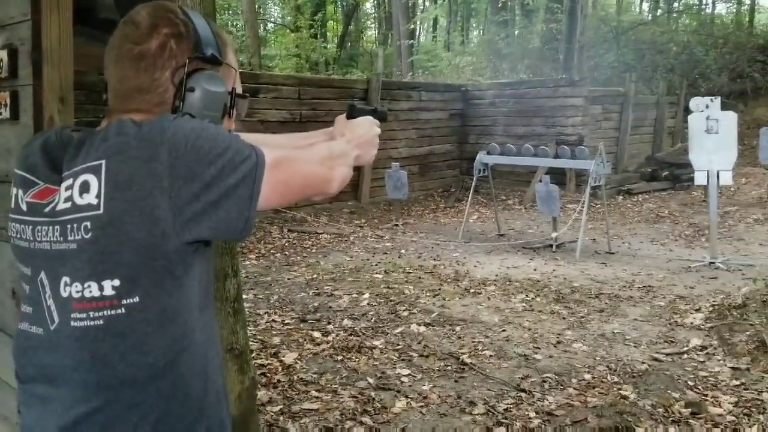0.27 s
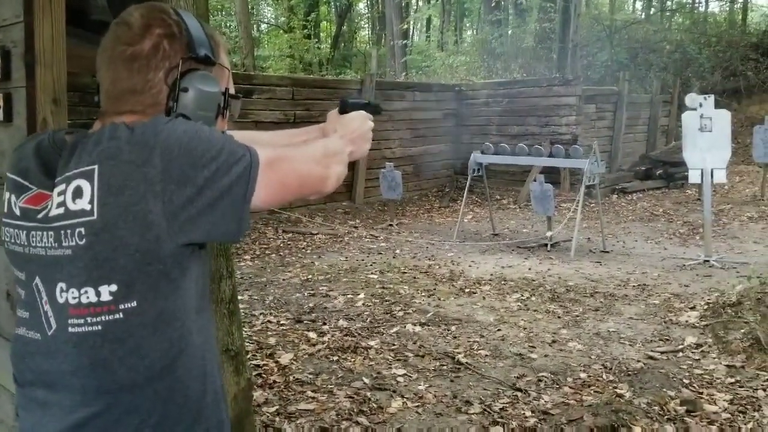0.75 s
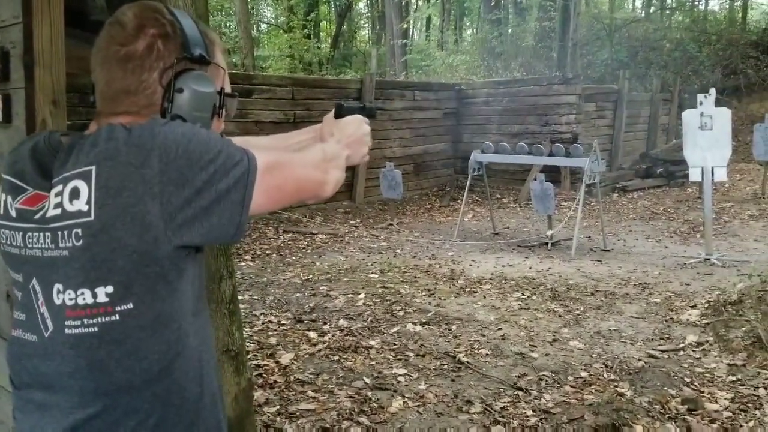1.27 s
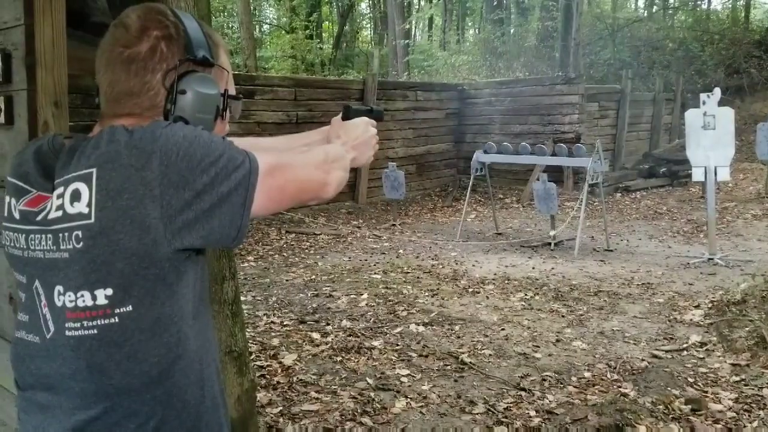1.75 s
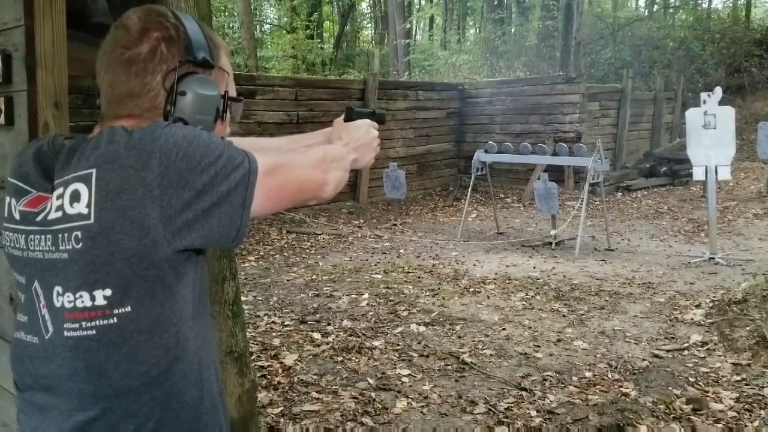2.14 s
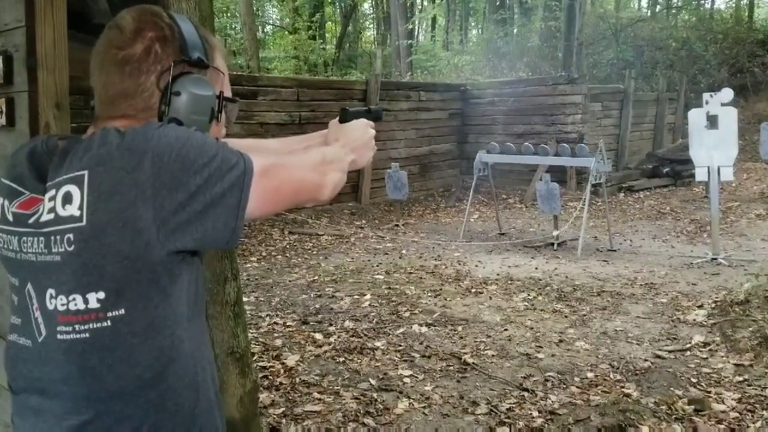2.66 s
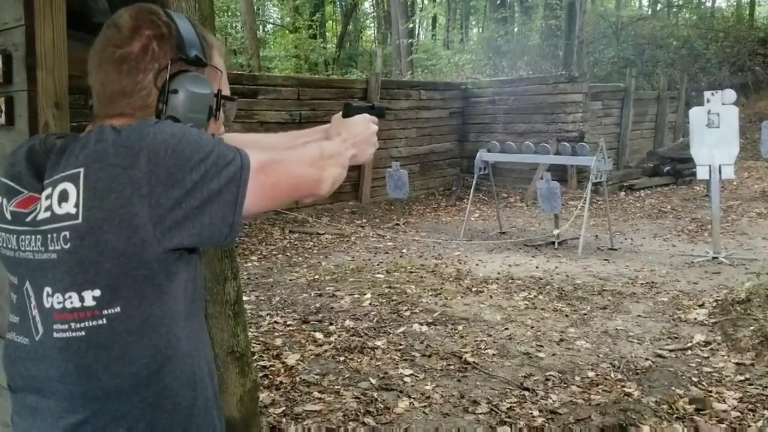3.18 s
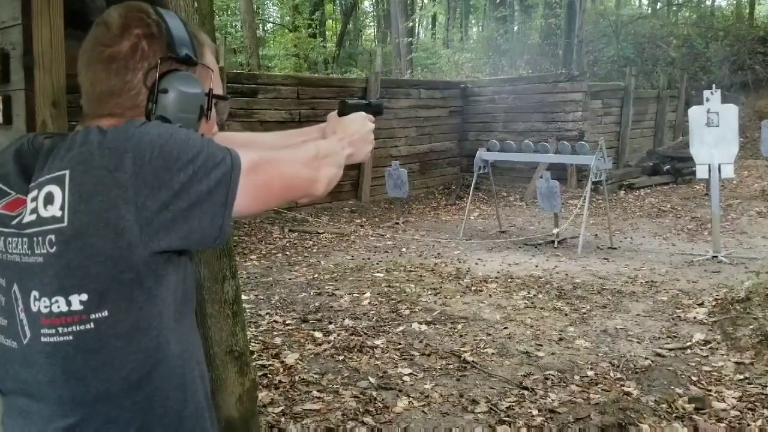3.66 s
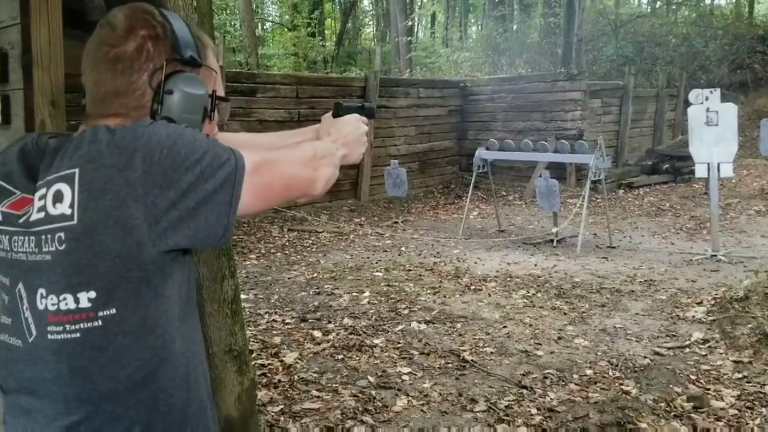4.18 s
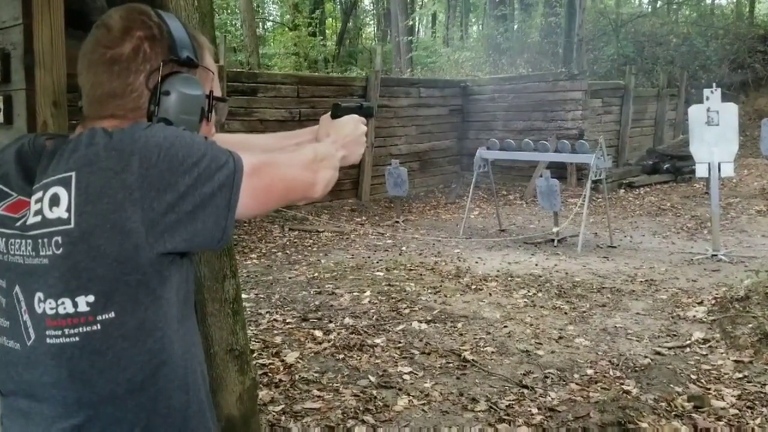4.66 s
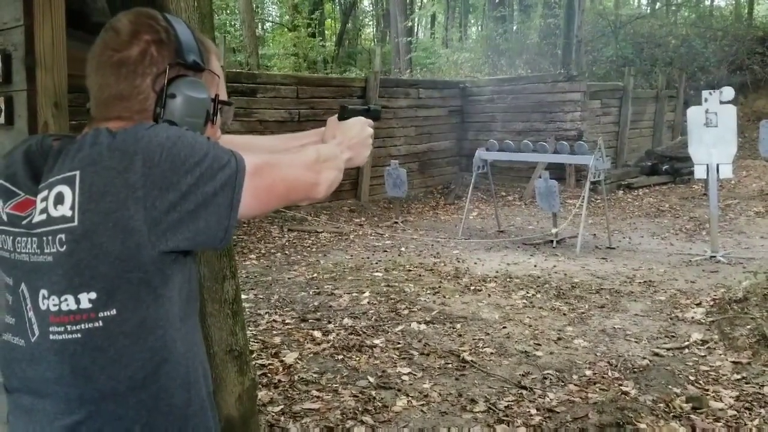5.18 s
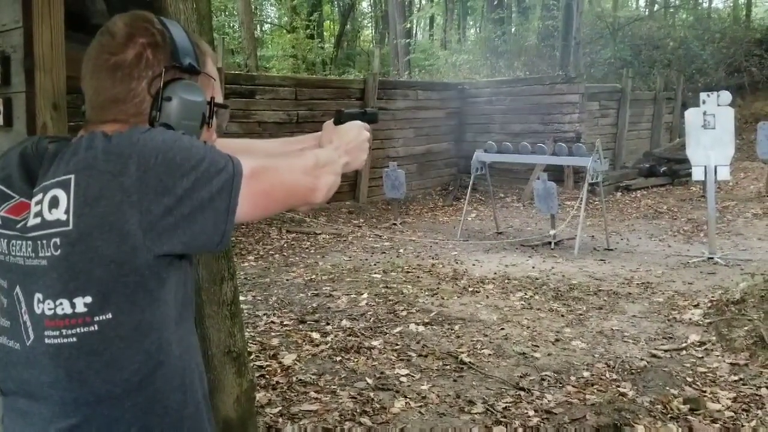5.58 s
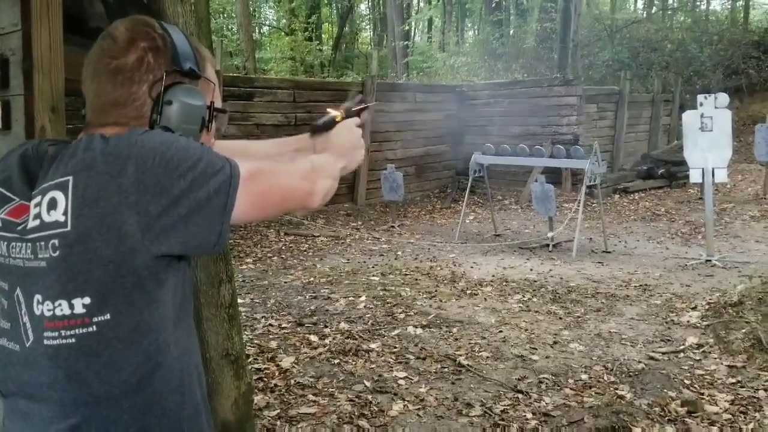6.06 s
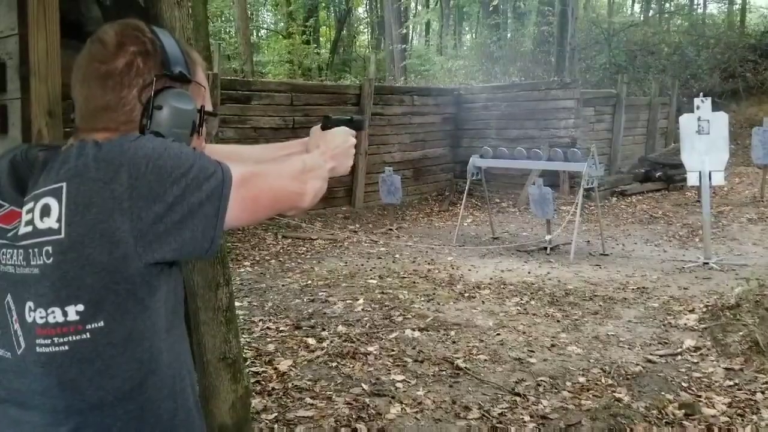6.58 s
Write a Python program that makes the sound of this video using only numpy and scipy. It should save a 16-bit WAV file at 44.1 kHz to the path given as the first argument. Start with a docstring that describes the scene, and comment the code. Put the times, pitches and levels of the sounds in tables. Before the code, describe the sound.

The sound opens on the decaying woodland tail of an earlier gunshot, with a tiny tick near 0.5 s. At 0.7 s a pistol fires very close: a sharp crack and thick blast, squashed by overload, a hard wall slap within a tenth of a second, then a wide tail through trees and a thin, wavering steel ring near 8 kHz. Small cases tick around 1.6 and 1.85 s. The second shot comes at 2.35 s, a tick at 2.7, then a steel paddle slams and rattles at 2.85 s, with weaker knocks at 3.0 and 3.3. More shots follow at 3.35, 4.35, 5.35 and 6.05 s, with fainter paddle clinks around 4.03 and 5.2. Soft low thuds and dry ticks of falling cases follow the shots, the last near 6.7 s, over faint steady woodland air as the final echo fades.

```python
"""A wooden shelter in woodland: a pistol fires six times at a steel target with swinging paddles.
It opens on the tail of an earlier shot. Each blast is decaying noise coloured by shelter, walls and trees,
with a crack, dull single echoes and the sines of the struck plate; every blast overloads the limiter.
Between the shots a paddle slams against its stop (noise and sines) and spent cases fall (snaps and thuds).
The quiet of the woods, a steady coloured noise, lies beneath."""
import sys
import numpy as np
from scipy import signal
from scipy.fft import rfft, irfft
from scipy.io import wavfile
from scipy.ndimage import uniform_filter1d

SR = 44100
rng = np.random.default_rng(int(sys.argv[2]) if len(sys.argv) > 2 else 0)


def wav_record(signal):
    """Record a signal, one row per channel, as 16-bit PCM in the file named by sys.argv[1]."""
    frames = np.transpose(np.atleast_2d(signal))
    bounded = np.clip(frames, -1, 1)
    # unit amplitude maps onto the largest positive 16-bit level
    quanta = np.round(bounded * 32767).astype(np.int16)
    wavfile.write(sys.argv[1], SR, quanta)


N = 301186

FRAME, HOP = 512, 128  # short-time spectra, samples
HZ = np.fft.rfftfreq(FRAME, 1 / SR)
# How alike the ears hear the open range. Each row: frequency in Hz, left-right likeness (1 is identical).
LIKENESS = [(60, 0.71), (150, 1), (380, 0.93), (950, 0.12), (2380, 0.01), (5980, -0.04), (15000, 0.24)]


def amp(db):
    """Decibels to gain."""
    return 10 ** (np.asarray(db, float) / 20)


def read(points, hz):
    """Reads a curve by straight lines on a log-frequency axis."""
    f, value = np.transpose(points)
    return np.interp(np.log(hz + 1), np.log(f + 1), value)


def add(mix, s, sound):
    """Mixes a sound in at a time in seconds, trimming what falls outside."""
    at = round(s * SR)
    sound = sound[:, max(-at, 0):]
    part = mix[:, max(at, 0):][:, :sound.shape[1]]
    part += sound[:, :part.shape[1]]


def colour(points):
    """Turns a spectrum in dB into a gain per bin with mean power 1."""
    gain = amp(read(points, HZ))
    return gain / np.sqrt(np.mean(gain ** 2))


def chance(likeness):
    """Random stereo spectra with a given likeness per bin and frame, complex where one ear leads."""
    # Balance of the ears. Each row: frequency in Hz, left over right in dB.
    balance = [(60, 3.5), (130, 0.5), (290, 1.0), (640, 0.5), (1410, 1.5), (3100, 3.0), (6820, -1),
               (15000, -1.5)]
    a, b, c, d = rng.standard_normal((*likeness.T.shape, 4)).T
    apart = np.sqrt(np.maximum(1 - abs(likeness) ** 2, 0))
    lean = amp(read(balance, HZ) / 2)[:, None]
    left = a + 1j * b
    right = likeness * left + apart * (c + 1j * d)
    return np.array([left * lean, right / lean])


def outdoors(seconds):
    """Random spectra with the stereo spread of the open range."""
    frames = int(seconds * SR) // HOP + 5
    return chance(read(LIKENESS, HZ)[:, None] * np.ones(frames))


def sounded(spectra):
    """Turns spectra back into sound; unit spectra give about unit rms."""
    return signal.istft(spectra, nperseg=FRAME, noverlap=FRAME - HOP)[1] / np.sqrt(1024)


def uneven(count, t, per_s, spread_db):
    """Wandering gains, one row each: random dB values, per_s of them a second, joined by lines."""
    knots = rng.standard_normal((count, 400))
    wander = np.array([np.interp(t * per_s, np.arange(len(k)), k) for k in knots])
    return amp(spread_db * wander)[:, None]


def rings(modes, t):
    """Dying sines, one row a mode, a little out of step between the ears."""
    hz, db, t60 = np.transpose(modes)[:, :, None, None]
    ear_lag = rng.uniform(0, 0.36, (len(modes), 2, 1))  # cycles
    phase = rng.random((len(modes), 1, 1)) + ear_lag
    return amp(db - 60 * t / np.maximum(t60, .02)) * np.sin(2 * np.pi * (hz * t + phase))


def reflections(frame_t):
    """Blast and three answering spaces, each dying at its own rate per frequency: field and likeness."""
    # Colours of the blast with its closest reflections, then of shelter, timber walls and trees.
    # Each row: frequency in Hz, relative density in dB per Hz.
    blast_colour, shelter_colour = [(18, -38.5), (30, -7), (245, -4), (404, -1), (666, -4), (866, -1),
                                    (1040, -8), (1190, -1), (1670, -10), (3980, -14.5), (5900, -19.5),
                                    (14800, -28), (16000, -36.5)], [(18, -55), (30, -26), (345, 0), (512, -11), (822, -3.5),
                                                   (889, -9.5), (1540, -13), (2170, -14.5), (5740, -23.5),
                                                   (7870, -22.5), (9460, -33), (12600, -26.5),
                                                   (16000, -40.5)]
    walls_colour, trees_colour = [(18, -56.5), (30, -28), (59, -25.5), (124, -11), (437, -9), (600, 0),
                                  (1040, -4), (1630, -13.5), (2120, -11), (5900, -18.5), (7870, -20),
                                  (9220, -29.5), (12300, -29.5), (16000, -37.5)], [(18, -46), (30, -16), (69, -12.5), (160, -18.5),
                                                 (307, -10), (341, -8), (747, 0), (830, -4.5), (1110, -3),
                                                 (1200, -6.5), (2240, -7), (2990, -15.5), (7860, -27.5),
                                                 (9190, -35), (15500, -43)]
    # Their decays. Each row: frequency in Hz, time to fall 60 dB in seconds.
    blast_t60, shelter_t60 = [(50, 0.14), (200, 0.078), (700, 0.16), (2000, 0.13), (6000, 0.12),
                              (15000, 0.15)], [(50, 0.18), (200, .25), (700, .27), (2000, 0.35),
                                                 (6000, 0.3), (15000, 0.34)]
    walls_t60, trees_t60 = [(50, 0.24), (200, 0.58), (700, 0.66), (2000, 0.88), (6000, 0.8), (15000, 0.81)], [(50, 0.96), (200, 1.6), (700, 2.39), (2000, 2.14),
                                               (4000, 2.1), (8000, 1.6), (15000, 1.3)]
    # Ears close to the blast. Each row: frequency in Hz, left-right likeness.
    near_likeness = [(60, 1), (150, 0.76), (380, 0.64), (950, 0.52), (2380, 0.22), (5980, 0.02),
                     (15000, 0.37)]
    # Close by, the bass reaches the left ear first. Each row: frequency in Hz, lead in radians.
    left_lead = [(40, 1.6), (90, 0.71), (160, 0.34), (300, 0.1)]

    spaces = [(blast_colour, blast_t60, 16), (shelter_colour, shelter_t60, 0),
              (walls_colour, walls_t60, -14), (trees_colour, trees_t60, -33)]  # last: level in dB
    powers = []
    for points, t60, db in spaces:
        decay = amp(db - 60 * frame_t / read(t60, HZ)[:, None])
        powers.append((colour(points)[:, None] * decay) ** 2)
    total = sum(powers)
    near = powers[0] / total  # share of the power that comes from close by
    near_pair = read(near_likeness, HZ) * np.exp(-1j * read(left_lead, HZ))
    likeness = near * near_pair[:, None] + (1 - near) * read(LIKENESS, HZ)[:, None]
    return np.sqrt(total), likeness


def bunching(length):
    """Envelope of the field: a quick rise, reflections in bunches, stands of trees answering together."""
    lumps_db, swells_db, rise_s = 1, 0.71, 0.0045
    lumps = rng.standard_normal(length)
    for _ in range(2):
        lumps = uniform_filter1d(lumps, size=60)
    lumps = lumps_db * lumps / lumps.std()
    lumps = amp(lumps - lumps.var() * np.log(10) / 20)  # keeps the mean power
    rise = np.minimum(np.arange(length) / (rise_s * SR), 1)
    swells = uneven(1, np.arange(length) / SR, 18, swells_db)[0, 0]
    return rise * lumps * swells


def boards(length):
    """Frequency response of the shelter's resonances, each a peak added to the plain sound."""
    # Resonances of the shelter. Each row: frequency in Hz, width in Hz, boost in dB.
    resonances = [(66.5, 36, 3), (116.7, 30, 6.5), (176, 26, 4), (237, 33, 4), (350.2, 23, 5.5),
                  (570.6, 14, 4.5), (740, 19, 2.5), (835, 18, 2.5), (946, 33, 3), (1062, 17, 4.5),
                  (1104, 39, 4.5), (2166, 180, 3.5)]
    hz = np.fft.rfftfreq(length, 1 / SR)
    boost = 1
    for f, width, db in resonances:
        damping = 1j * hz * width
        boost = boost + (amp(db) - 1) * damping / (f ** 2 - hz ** 2 + damping)
    return boost


def crack():
    """The sharp edge of the muzzle blast: a short burst of differenced, treble-heavy noise."""
    level_db, t60, rise_s = -1, .035, 0.0016
    t = np.arange(3000) / SR
    noise = np.diff(rng.standard_normal((2, len(t) + 1)))
    return noise * amp(level_db - 60 * t / t60) * np.minimum(t / rise_s, 1)


def slap(delay):
    """A wall dulls the blast to a few cycles; a far, uneven one returns them as a scattered bunch."""
    slap_hz, peak_s = 695, .0017
    smear = .035  # spread of a far echo, in proportion to its delay
    t, out = np.arange(600) / SR, np.zeros((2, 4000))
    cycles = np.sin(2 * np.pi * slap_hz * t) * (t / peak_s) * np.exp(1 - t / peak_s)
    count = 1 + int(delay / .1)
    for k, (late, side) in enumerate(rng.random((count, 2))):
        start = smear * delay * (k + late) * (k > 0) / 2  # the first is on time
        add(out, start, cycles * np.array([[1 - side * delay], [1 + side * delay]]))
    return out / np.sqrt(count)


def plate():
    """The struck steel plate: dying sines whose levels waver as it swings, close modes beating."""
    # Modes of the plate. Each row: frequency in Hz, level in dB, time to fall 60 dB in seconds.
    plate_modes = [(7817, -1.5, 0.86), (7890, -5.5, .5), (8166, -8, .42), (7636, -9, .4),
                   (6400, -11.5, 0.32), (10150, -10, 0.22)]
    t = np.arange(SR) / SR
    swing = uneven(len(plate_modes), t, 160, 5.0)
    return (rings(plate_modes, t) * swing).sum(0)


def shots():
    """Each shot: a decaying field of reflections, mostly alike, plus single echoes, plate and crack."""
    # The shots, the first a moment before the start. Each row: start in seconds, level in dB,
    # bass in dB (full below 100 Hz, none above 400 Hz), plate ring in dB before the shot's level.
    firings = [(-.46, 1, -8, -52.5), (.6910, 1.5, -1, -41.5), (2.3399, -0.5, 0.9, -60.5),
               (3.3579, -1.2, 1, -45), (4.3486, 0.1, -2, -59.5), (5.358, 1.35, 2, -58),
               (6.056, 1.2, 1.5, -53)]
    # The direct wave, then the walls that throw it back distinctly. Each row: delay in seconds, level in dB.
    returns = [(.0016, -7), (.0653, -3.5), (.082, -16), (.105, -22.5), (.172, -29.5), (.335, -38),
               (.395, -39.5)]
    repeat = .85  # weight of the echo pattern that every shot shares
    flight_s = 0.044  # bullet out, sound back

    out, frame_t = np.zeros((2, N)), np.arange(760) * HOP / SR
    field, likeness = reflections(frame_t)
    pattern = chance(likeness)
    length = (len(frame_t) - 1) * HOP
    front, boost = bunching(length), boards(length)
    slaps = [(delay, amp(db) * slap(delay)) for delay, db in returns]
    for s, db, bass_db, ring_db in firings:
        tone = amp(read([(100, bass_db), (400, 0)], HZ))[:, None]
        spectra = repeat * pattern + np.sqrt(1 - repeat ** 2) * chance(likeness)
        blast = sounded(spectra * field * tone) * front
        blast = irfft(rfft(blast) * boost, length)
        for delay, echo in slaps:
            add(blast, delay, echo)
        add(blast, flight_s, amp(ring_db) * plate())
        add(blast, .0008, crack())
        add(out, s, amp(db) * blast)
    return out


def air():
    """The quiet of the woods: steady coloured noise, spread wide."""
    # Each row: frequency in Hz, relative density in dB per Hz.
    woods = [(18, -50.5), (30, -18), (81, -1), (100, -5), (157, -28.5), (364, -11.5), (740, -2),
             (2170, -24), (3580, -32.5), (16000, -34)]
    spectra = outdoors(N / SR) * colour(woods)[:, None]
    return amp(-73.5) * sounded(spectra)[:, :N]


def cases():
    """Spent cases: a thud is a few low cycles; a tick a two-millisecond snap with a faint rustle."""
    # Cases land softly on boards, one after each shot: starts in seconds.
    landings = [.135, 1.275, 2.82, 3.97, 4.955, 5.93, 6.63]
    # Cases tick on the ground. Each row: start in seconds, level in dB,
    # frequency in Hz near the top of the snap's band, left over right in dB.
    ground_ticks = [(0.4927, -53.5, 12400, -2.0), (1.6118, -44.5, 5100, 3), (1.6332, -52, 12400, -7),
                    (1.8494, -57, 4150, -1.5), (2.6918, -42, 5680, 0.0), (5.0493, -52.5, 12540, -2.5),
                    (5.9319, -46.5, 4860, 0.0), (6.6194, -52, 4230, -0.5), (6.7064, -50, 5430, 0)]
    thud_db, thud_hz, thud_peak_s = -67.5, 68, .014

    out, t = np.zeros((2, N)), np.arange(SR // 8) / SR
    swell = (t / thud_peak_s) * np.exp(1 - t / thud_peak_s)
    thud = amp(thud_db) * np.sin(2 * np.pi * thud_hz * t) * swell
    for s in landings:
        add(out, s, thud * np.ones((2, 1)))
    for s, db, hz, pan_db in ground_ticks:
        edges = np.clip([hz / 5.1, hz * 1.1], 200, 20000)
        noise = rng.standard_normal((2, len(t)))
        band = signal.butter(1, edges, "bandpass", fs=SR)
        snap = signal.lfilter(*band, noise) * amp(-60 * t / .014)
        rustle = np.diff(noise[::-1], prepend=0) * amp(-18.5 - 60 * t / 0.19)  # ears swapped
        pan = amp([[pan_db / 2], [-pan_db / 2]])
        add(out, s, amp(db) * (snap + rustle) * pan)
    return out


def paddle():
    """Each slam: the steel chatters against its stop, rings unevenly, and is damped as it comes to rest."""
    # Slams against the stop. Each row: start in seconds, clatter level in dB, ring level in dB,
    # length in seconds (down 12 dB by then), frequency in Hz best struck.
    stops = [(2.833, -33, -39, .11, 2236), (2.865, -52, -39.5, 0.15, 4037),
             (3.007, -47.5, -47.5, 0.13, 2236), (3.31, -57, -53, 0.22, 2024),
             (4.022, -48, -45.5, 0.15, 1440), (4.05, -49.5, -51, 0.1, 3750),
             (5.214, -52, -55.5, .028, 2000), (5.334, -52, -48.5, 0.045, 1170)]
    # Modes of the paddle. Each row: frequency in Hz, level in dB, seconds to fall 60 dB before the damping.
    paddle_modes = [(608, 0, .25), (786, 0, .3), (960, -2, .25), (1179, -1, .3), (1497, -3, .3),
                    (1640, -3, .25), (1868, -4, .25), (2003, -3, .3), (2236, 0, .33), (2850, -6, .3),
                    (3225, -4, .18), (3386, -6, .2), (3558, -4, .3), (4037, -2, .3), (4872, -6, .2),
                    (5238, -7, .1), (5561, -9, .3), (6449, -10, .25), (7542, -12, .2), (8188, -12, .3)]
    # Colour of the clatter around the ring. Each row: frequency in Hz, relative density in dB per Hz.
    clatter_colour = [(59, -51), (100, -30), (768, -13), (1080, -10), (2270, -8), (2520, -12),
                      (4110, -10.5), (4380, -11), (16000, -22)]
    tilt_db, dulling_db = -0.6, -22  # dB per octave above 2 kHz, and its change per second
    ring_rise_s, rebounds_db = 0.018, 2.5

    out, t = np.zeros((2, N)), np.arange(SR // 3) / SR
    mode_hz = np.transpose(paddle_modes)[0][:, None, None]
    octaves = np.maximum(np.log2((HZ[:, None] + 50) / 2000), 0)
    for s, db, ring_db, length, struck_hz in stops:
        knocks = uneven(1, t, 1100, rebounds_db)[0]
        grains = outdoors(.4)
        tilt = tilt_db + dulling_db * np.arange(grains.shape[2]) * HOP / SR
        tone = colour(clatter_colour)[:, None] * amp(tilt * octaves)  # dulls as it dies
        clatter = sounded(grains * tone)[:, :len(t)] * amp(db) * knocks
        # modes a quarter octave or more from the best struck one lose 11.5 dB
        struck = amp(-11.5 * np.minimum(abs(np.log2(mode_hz / struck_hz)) / .25, 1))
        chatter = uneven(len(paddle_modes), t, 130, 3.8)  # small rebounds feed or damp each mode
        ring = (struck * chatter * rings(paddle_modes, t)).sum(0)
        ring = amp(ring_db) * ring * np.minimum(t / ring_rise_s, 1)
        damped = amp(-12 * (t / length) ** 2) + amp(-18 - 60 * t / .55)  # a faint tail rings on
        add(out, s, (clatter + ring) * damped * np.minimum(t / 0.0015, 1))
    return out


def scene():
    """Gun and plate, the quiet of the woods, cases and paddle together."""
    return shots() + air() + cases() + paddle()


def record(dry):
    """A limiter that looks ahead holds the blast at a plateau; then soft clip, hiss, bass cut and band limit."""
    threshold_db, recovery_db_per_s = -12, 1300.0
    hiss_db = -87.5  # the microphone's own noise
    power = abs(uniform_filter1d((dry ** 2).mean(0), round(0.0091 * SR)))
    power_db = 10 * np.log10(power + 1e-12)
    fall = np.arange(N) * recovery_db_per_s / SR
    held_db = np.maximum.accumulate(power_db + fall) - fall  # rises at once, falls steadily
    over_db = np.maximum(held_db - threshold_db, 0)
    # windows centred on each moment let the gain drop before the blast
    held = dry / amp(1.041 * uniform_filter1d(over_db, round(0.0023 * SR)))
    soft = 1.341 * np.tanh(held / 1.263)
    hissing = soft + amp(hiss_db) * rng.standard_normal(dry.shape)
    cut = signal.sosfilt(signal.butter(2, 38, "highpass", fs=SR, output="sos"), hissing)
    band_limit = signal.firwin(127, 16000, window=("kaiser", 9), fs=SR)
    return signal.oaconvolve(cut, band_limit[None], "same")


dry = scene()
out = record(dry)
wav_record(out)
```